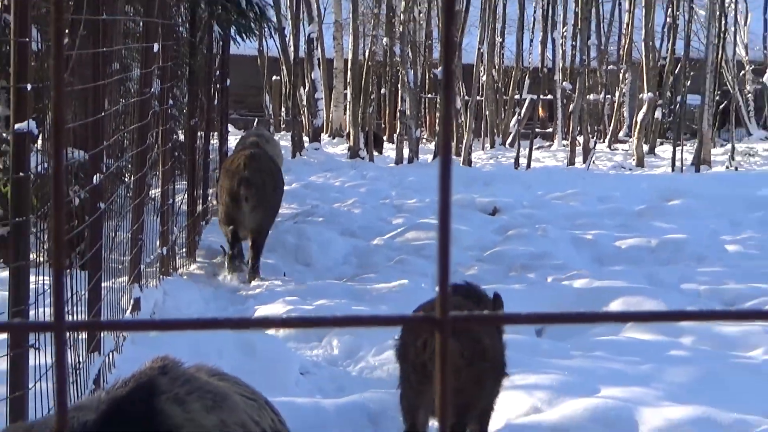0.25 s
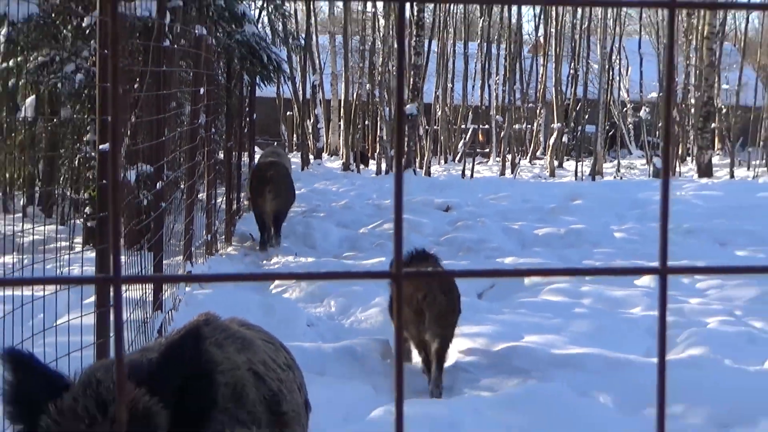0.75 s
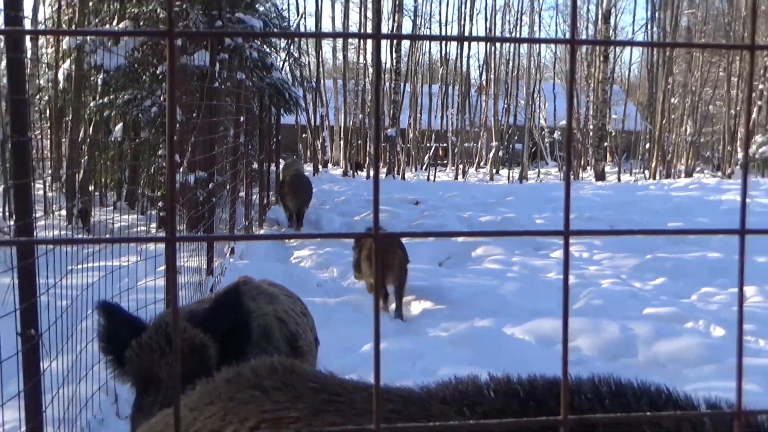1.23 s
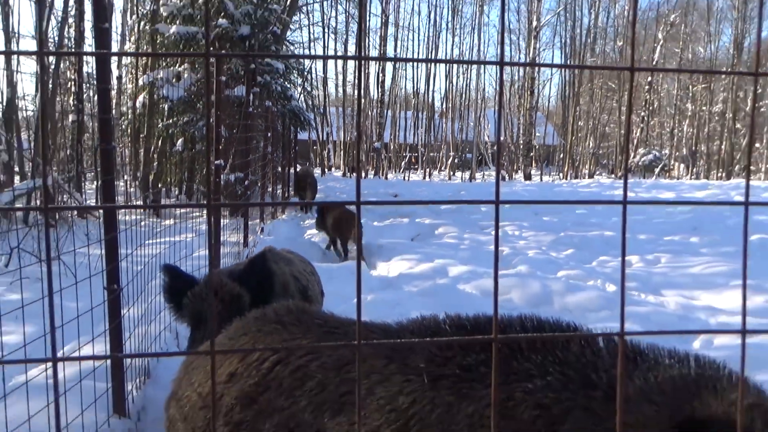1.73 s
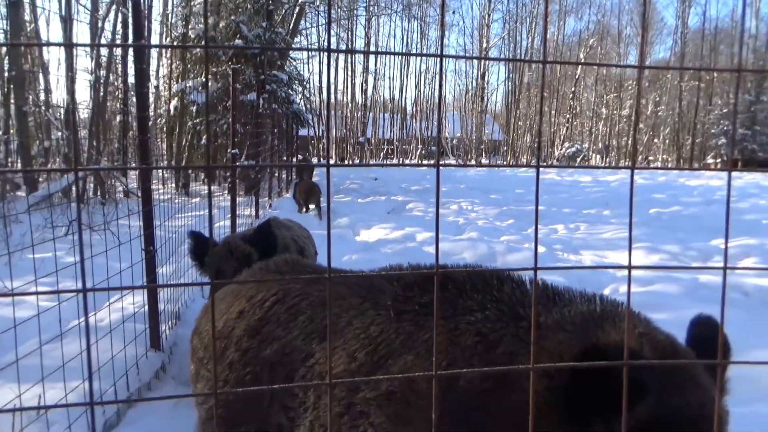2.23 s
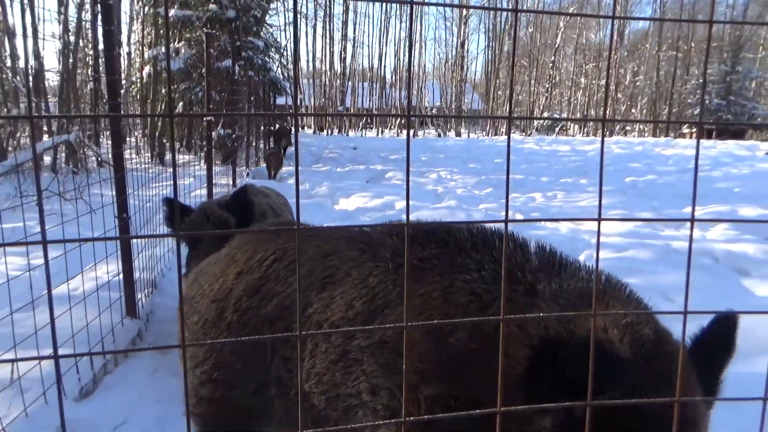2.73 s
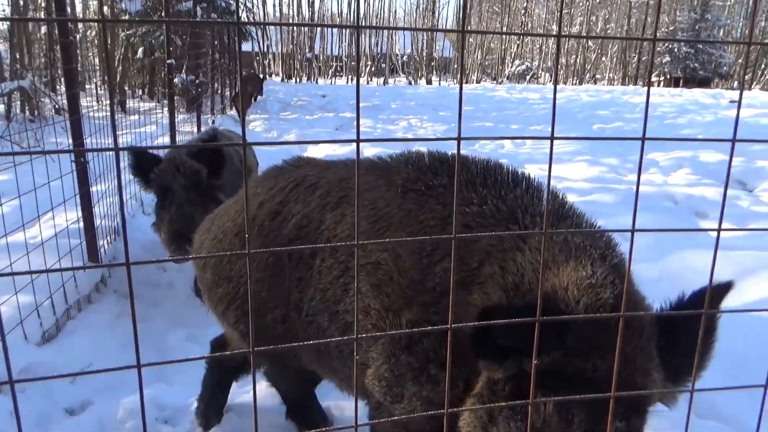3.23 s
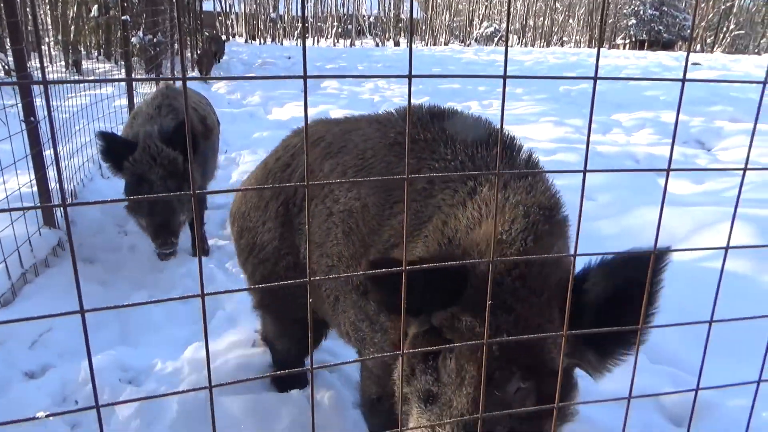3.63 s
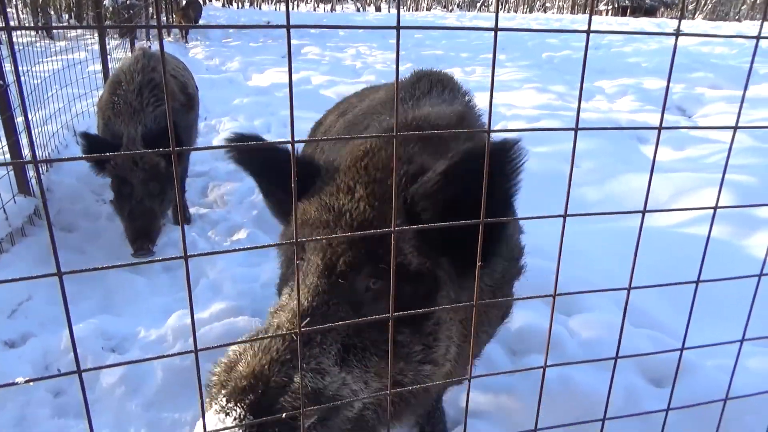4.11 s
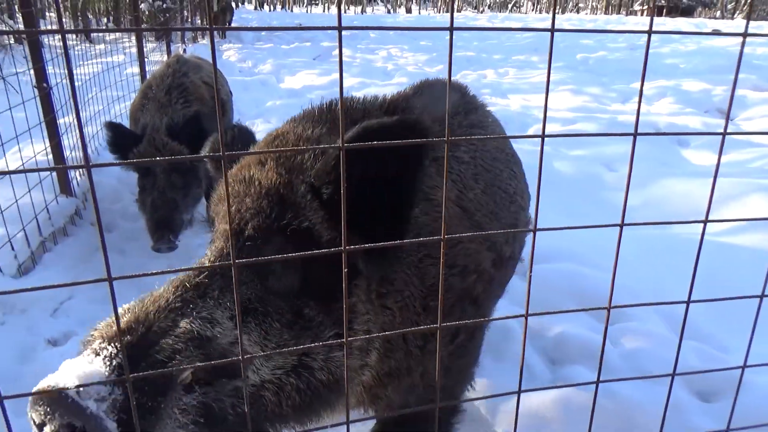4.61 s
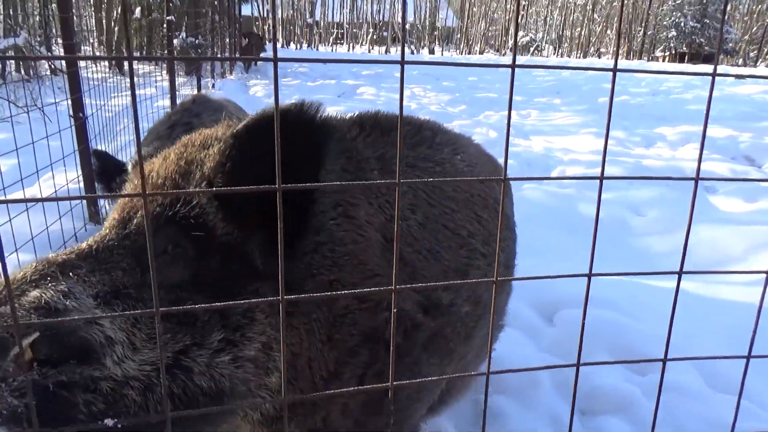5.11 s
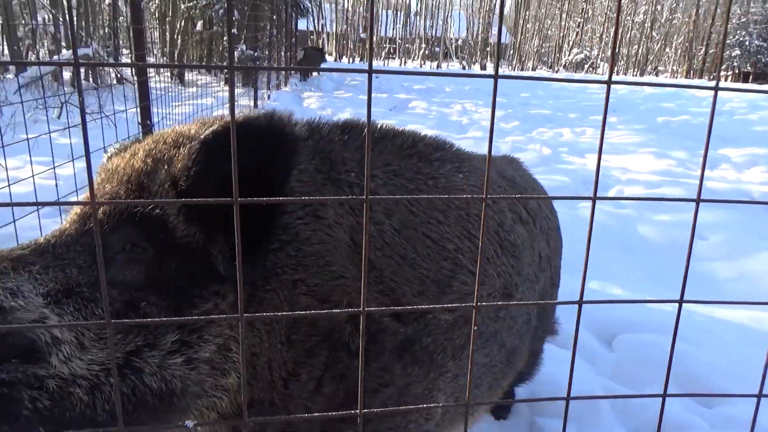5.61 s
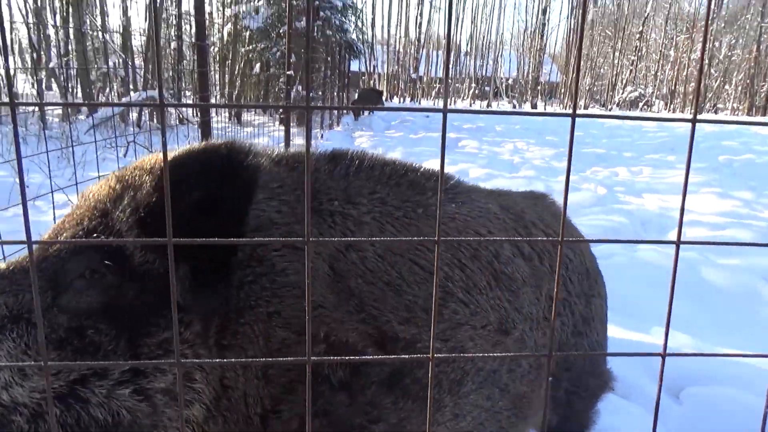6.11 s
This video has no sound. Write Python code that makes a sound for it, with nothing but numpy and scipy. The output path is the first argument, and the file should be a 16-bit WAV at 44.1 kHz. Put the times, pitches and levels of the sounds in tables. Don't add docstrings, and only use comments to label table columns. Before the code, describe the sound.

Still, open winter air with a soft hiss and a faint, slightly unsteady machine hum far away. From 0 to 2.2 seconds small, fizzy hoof crunches and tiny crust ticks move off through snow. A low, brief boar grunt comes at about 0.8, a longer, rougher one at 1.05 to 1.4, and a short one near 1.55, with fluttering, rattling snores on top. It is nearly quiet until 2.6, when fine dry crackling starts close by. From 3.2 the snow crunches in grainy shoves, with dull thuds and small squelches; a gentle sniff comes around 4. Crisp cracks thicken after 4.1. At 4.85 to 5.15 a forceful sniff meets the loudest, sharp, brittle crust breaks. Another sniff follows at 5.25, then crunching continues with whistly, breathy nostril puffs around 5.6 to 6.1, easing into lighter crumbling and thuds by 6.35. The close sounds are dry, wide and slightly left-leaning.

```python
import sys
import numpy as np
from scipy import signal
from scipy.fft import rfft, irfft, next_fast_len
from scipy.io import wavfile
from scipy.ndimage import uniform_filter1d, map_coordinates

SR = 44100
rng = np.random.default_rng(int(sys.argv[2]) if len(sys.argv) > 2 else 0)


def master_out(mix):
    frames = np.transpose(np.atleast_2d(mix))
    ceiling = np.clip(frames, -1, 1)
    pcm = np.round(ceiling * 32767).astype(np.int16)
    wavfile.write(sys.argv[1], SR, pcm)


def ratio_of_db(decibels):
    return 10 ** (np.asarray(decibels, float) / 20)


N = 280374


def unit(x):
    return x / np.sqrt(np.mean(x ** 2) + 1e-20)


def along(points, hz):
    f, v = np.transpose(points)
    return np.interp(np.log(hz + 1), np.log(f + 1), v)


def curves(rows, fade=0.013):
    s, *cols = np.transpose(rows)
    t = np.arange(N) / SR
    gate = np.interp(t, [s[0] - fade, s[0], s[-1], s[-1] + fade], [0, 1, 1, 0])
    return [np.interp(t, s, c) for c in cols] + [gate]


def wobble(rate):
    knots = rng.standard_normal(int(N * rate / SR) + 4)
    return map_coordinates(knots, [np.arange(N) * rate / SR])


def filtered(x, response):
    m = next_fast_len(N + SR // 4)
    return irfft(rfft(x, m) * response(np.fft.rfftfreq(m, 1 / SR)), m)[..., :N]


def colour(spectrum):
    return lambda hz: unit(ratio_of_db(along(spectrum, hz)))


def cavity(modes):
    def response(f):
        h = sum(ratio_of_db(db) * 1j * f * w / (c * c - f * f + 1j * f * w) for c, w, db in modes)
        return h / np.sqrt(np.mean(abs(h) ** 2))
    return response


def grit(shape, spike_db):
    return unit(rng.standard_normal(shape) * ratio_of_db(spike_db * rng.exponential(size=shape)))


def place(seconds, pieces):
    first = np.round(np.asarray(seconds) * SR).astype(int)
    at = first[:, None] + np.arange(pieces.shape[1])
    return np.bincount(at.ravel(), pieces.ravel(), N + SR)[:N]


def bursts(length_ms, spike_db, fall_db, rise=.35):
    u = np.arange(SR // 25) * 1000 / SR / np.clip(length_ms, .3, 18)[:, None]
    clump_db = 2.5 * np.repeat(rng.standard_normal((len(u), 41)), 44, axis=1)[:, :u.shape[1]]
    main_break = ratio_of_db(-fall_db * u) * np.clip(5 - 5 * u, 0, 1)
    crumble = ratio_of_db(-15) * np.clip(10 - 5 * u, 0, 1)
    run = grit(u.shape, spike_db) * ratio_of_db(clump_db) * (main_break + crumble) * np.clip(u / rise, .1, 1)
    return run / np.sqrt((run ** 2).sum(axis=1, keepdims=True) / (length_ms[:, None] * SR / 1000))


# frequency in Hz, level in dB.
AIR_TONE = [(20, -30), (58, -2), (110, -14.5), (180, -11), (260, -7), (400, -12), (780, -10.5), (1300, -14),
            (3500, -19.5), (4900, -21.5), (6000, -23), (9000, -21.5), (12000, -26), (16000, -33)]
# frequency in Hz, likeness from 0 to 1.
AIR_ALIKE = [(60, 1.0), (130, 0.93), (290, 0.85), (640, 0.28), (1410, 0.26), (3100, 0.56), (6820, 0.8),
             (15000, 1)]


def still_air():
    turn = lambda hz: np.arccos(np.clip(along(AIR_ALIKE, hz), -1, 1)) / 2
    shape = lambda hz: ratio_of_db(along(AIR_TONE, hz)) * [np.cos(turn(hz)), np.sin(turn(hz))]
    mid, side = filtered(rng.standard_normal((2, N)), shape)
    return ratio_of_db(-61.5 + 0.4 * wobble(5.64)) * unit(np.array([mid + side, mid - side]))


# frequency in Hz, rms level in dB.
HUM = [
    (56.5, -64.5),
    (217, -77.5),
]
# frequency in Hz, width in Hz, level in dB.
MURMUR = [
    (255, 24, 1),
    (746, 93, -3),
]


def far_machine():
    murmur = ratio_of_db(-72.5 + 2.8 * wobble(9.8)) * filtered(rng.standard_normal(N), cavity(MURMUR))
    hum = 0
    for hz, db in HUM:
        phase = 2 * np.pi * hz * np.cumsum(1 + 0.0096 * wobble(2.3)) / SR
        hum = hum + np.sqrt(2) * ratio_of_db(db + wobble(4.16)) * np.sin(phase)
    return hum + murmur


# middle in seconds, half length in seconds, fizz level in dB, crunch level in dB.
HOOF_FALLS = [(.01, 0.02, -68, -82), (0.258, 0.047, -65, -74), (0.423, 0.049, -71, -80),
              (0.535, 0.018, -71, -85), (0.74, 0.039, -68.5, -71), (0.954, 0.012, -68, -74),
              (1.125, 0.18, -69, -65.5), (1.25, 0.016, -58, -66), (1.368, 0.085, -64, -63),
              (1.54, 0.063, -74, -67), (1.637, 0.059, -63.5, -64.5), (1.846, 0.059, -71, -80),
              (1.99, 0.017, -72, -60), (2.233, 0.019, -65, -59.5)]
# start in seconds, peak in dB.
TICKS = [
    (0.2128, -44),
    (0.392, -45),
    (0.5423, -44),
    (0.7167, -46),
    (0.9476, -39.5),
    (1.233, -42),
    (1.246, -33.5),
    (1.3283, -46),
    (2.0352, -43),
    (2.2122, -38),
]
# frequency in Hz, level in dB per Hz.
FIZZ = [(3000, -66), (5000, -12), (6500, -1), (8700, 3), (10500, -2), (12000, -9), (14000, -13.5),
        (16000, -29)]
# frequency in Hz, level in dB per Hz.
SHARD = [(450, 1), (1000, 5), (2000, 7), (3000, 6), (5000, -2.5), (7000, -18), (16000, -43)]


def trot():
    s, half, fizz_db, crunch_db = np.transpose(HOOF_FALLS)[:, :, None]
    swell = np.exp(-((np.arange(0, N, 64) / SR - s) / half) ** 2)
    fizz, crunch = (np.repeat((ratio_of_db(db) * swell).sum(axis=0), 64)[:N] for db in (fizz_db, crunch_db))
    grains = ratio_of_db(2 * wobble(60)) * grit(N, spike_db=1.5)
    puffs = fizz * unit(filtered(grains, colour(FIZZ))) + crunch * unit(filtered(grains, colour(SHARD)))
    s, db = np.transpose(TICKS)
    run = bursts(np.full(len(s), 1.5), spike_db=1.5, fall_db=14)
    ticks = filtered(place(s, run * ratio_of_db(db - 11.5)[:, None]), colour(FIZZ))
    return puffs + ticks


def grunt(rows, orders):
    hz, effort_db, open_db, on = curves(rows)
    phase = 2 * np.pi * np.cumsum(hz * (1 + 0.017 * wobble(24.56))) / SR
    levels_db = effort_db, effort_db + open_db, effort_db - 10.5
    tones = (np.sqrt(2) * ratio_of_db(db + 2.1 * wobble(29.3)) * np.sin(k * phase) for k, db in zip(orders, levels_db))
    return on * sum(tones)


# time in seconds, pitch in Hz, effort in dB, throat openness in dB.
GRUNT_LOW = [
    (.75, 60.2, -63, -16),
    (.83, 57.2, -55, -10),
    (.9, 53.5, -59, -1.5),
    (.95, 52, -61, -4),
    (.99, 49, -80, 13),
    (1.05, 47.2, -81, 18),
]
GRUNT_LONG = [
    (1.075, 38.9, -55, -5),
    (1.09, 39.9, -62, -1),
    (1.15, 43.2, -56.5, -3),
    (1.26, 41.1, -59.5, -8),
    (1.3, 42.7, -59, 0),
    (1.34, 35.9, -56, 1),
    (1.38, 46, -56, -9),
    (1.41, 49, -65, 0),
]
GRUNT_SHORT = [
    (1.48, 39.5, -78, 9),
    (1.52, 39, -73, 2),
    (1.6, 39, -65, -7),
    (1.64, 39, -78, 2),
]


def grunting():
    return grunt(GRUNT_LOW, (1, 2)) + grunt(GRUNT_LONG, (2, 3, 5)) + grunt(GRUNT_SHORT, (2, 3, 5))


# first, last and loudest slap in seconds, peak in dB, nasal ring in dB.
SNORES = [
    (.815, .864, .84, -50, -70),
    (1.04, 1.142, 1.04, -35, -57),
    (1.186, 1.287, 1.287, -41, -57),
    (1.3094, 1.38, 1.33, -44, -59),
    (1.5022, 1.5022, 1.5022, -47, -66),
    (1.5246, 1.603, 1.59, -33, -54),
    (1.6257, 1.6257, 1.6257, -46, -63),
    (2.2374, 2.2374, 2.2374, -46, -63),
]
# frequency in Hz, width in Hz, level in dB.
SNOUT = [
    (1600, 650, 0),
    (2400, 800, 0),
    (3050, 500, 0),
    (4450, 600, 0),
]


def snore():
    slap_s, quickens_s = .0248, .002
    swell, fade = 108, 199
    slaps = []
    for first, last, top, db, nasal_db in SNORES:
        u = np.linspace(0, 1, round(abs(last - first) / slap_s) + 1)
        beats = first + (last - first) * u + quickens_s * (last - first) / slap_s * u * (1 - u)
        slaps += [(s, db - swell * max(top - s, 0) - fade * max(s - top, 0), nasal_db) for s in beats]
    s, db, nasal_db = np.transpose(slaps)
    t = np.arange(400) / SR
    slap = (t == 0) + .13 * rng.standard_normal((len(s), len(t))) * ratio_of_db(-60 * t / .013)
    share_db = rng.standard_normal((len(s), 4)).T * [[1.5], [1.5], [3], [3]]
    levels_db = db - 3, db - 3, nasal_db - 2, nasal_db + 2
    out = 0
    for mode, level_db, own_db, sign in zip(SNOUT, levels_db, share_db, (1, -1, 1, -1)):
        ring = lambda hz: cavity([mode])(hz) ** 2 * hz ** 2 / (hz ** 2 + 900 ** 2)
        out = out + filtered(place(s + .001, sign * slap * ratio_of_db(level_db + own_db)[:, None]), ring)
    return out


def pushes(rows, fall_db, lag):
    s, db, hz = np.transpose(rows)[:, :, None]
    turn = hz * np.arange(SR // 12) / SR
    swing = ratio_of_db(db - fall_db * turn) * np.sin(2 * np.pi * turn) * (1 - np.exp(-turn / 0.18))
    return place(s[:, 0] + lag, swing)


# start in seconds, peak in dB, frequency in Hz.
THUDS = [(2.935, -37, 556), (3.065, -44, 410), (3.185, -33.5, 490), (3.228, -49, 182), (3.286, -39, 470),
         (3.418, -41, 373), (3.501, -43, 388), (3.795, -49, 163), (4.089, -42, 537), (4.191, -34, 460),
         (4.237, -40.5, 505), (4.306, -41.5, 136), (4.37, -37.5, 550), (4.433, -33, 220),
         (4.665, -43.5, 210), (4.713, -42, 149), (4.771, -40, 231), (4.867, -40, 177), (4.904, -36, 225),
         (4.986, -33, 285), (5.119, -30, 257), (5.202, -29.5, 221), (5.285, -35, 450), (5.447, -33.5, 340),
         (5.655, -37, 263), (5.867, -35, 537), (5.989, -39, 210), (6.088, -34.5, 169), (6.165, -39.5, 150),
         (6.228, -38.5, 147), (3.711, -49, 156), (3.896, -48.5, 159), (5.342, -42, 174), (5.78, -44, 200),
         (5.845, -51, 151), (5.866, -39, 201.8), (5.99, -41, 406), (6.04, -44, 151), (6.231, -39, 475.4)]
# start in seconds, peak in dB, frequency in Hz.
SQUELCHES = [
    (2.884, -37, 886),
    (2.940, -32, 1050),
    (3.0105, -35, 1390),
    (5.1245, -22, 1090),
    (5.452, -30, 1440),
    (6.2, -37, 1250),
    (6.352, -37, 690),
    (3.898, -31, 1330),
    (5.758, -36, 910),
]


def thuds():
    pockets = pushes(SQUELCHES, fall_db=2.2, lag=.001)
    return ratio_of_db(8.5) * pushes(THUDS, fall_db=8.5, lag=0.00413) + pockets


# time in seconds, peak in dB, frequency in Hz.
SNAPS = [(1.155, -30, 4940), (3.6495, -37, 7000), (3.811, -16.5, 9150), (4.198, -22, 6000),
         (4.4973, -17.5, 9000), (4.843, -21, 6000), (4.9045, -5.5, 5960), (4.9241, -9.5, 6530),
         (4.9916, -10.5, 3400), (4.995, -10, 6000), (4.9948, -17, 6040), (5.1237, -16.5, 4000),
         (5.1269, -12, 2580), (5.2426, -15, 6000), (5.2915, -22, 1800), (5.4526, -14, 2000),
         (5.5655, -26, 1500), (5.513, -19, 7990), (5.524, -19, 7000), (5.5358, -21, 7000)]


def snaps():
    s, db, hz = np.transpose(SNAPS)[:, :, None]
    turn = hz * (np.arange(64) - 24) / SR
    return place(s[:, 0] - 24 / SR, -ratio_of_db(db) * np.cos(2 * np.pi * turn) * np.exp(-(turn / .45) ** 2))


# start in seconds, peak in dB, chunk share in dB, fizz share in dB.
BREAKS = [(2.7073, -19.5, -24, -14), (2.9402, -25, -18, -9), (3.073, -30.5, -6.5, -3.5),
          (3.237, -18.5, -45, -4.5), (3.2864, -30.5, -5, -24), (3.4298, -21, -16.5, -15),
          (3.5117, -22.5, -22, -18), (3.898, -29.5, -8, -4), (4.142, -23.5, -39, -7),
          (4.1975, -20, -16, -1), (4.2443, -22.5, -17, -6), (4.3064, -20.5, -18, -10.5),
          (4.4281, -18, -15, -11), (4.6045, -29, -12, -11), (4.7159, -25.5, -6, -8),
          (4.778, -26.5, -17, -12), (4.8374, -24.5, -21, -1), (4.8696, -13.5, -27, -14),
          (4.9911, -4.5, -27, -8.5), (5.1234, -4, -21.5, -11), (5.206, -16.5, -12.5, -9),
          (5.2907, -19, -8.5, -11.5), (5.3556, -29.5, -2.5, -28), (5.451, -19, -6, -11),
          (5.5648, -22, -5, -8), (5.663, -11.5, -28, -12), (5.6982, -17, -19, -20),
          (5.8725, -18, -12, -11.5), (6.0927, -21.5, -6.5, -4), (6.236, -48, 8, -20)]
# start in seconds, peak in dB.
CRACKLES = [(2.599, -37), (2.6145, -41.5), (2.641, -39), (2.6758, -31.5), (2.7362, -34), (2.754, -33),
            (2.7835, -32), (2.8187, -30.5), (2.837, -31), (2.8573, -32), (2.881, -31), (2.924, -33),
            (2.97, -27), (3.0093, -27.5), (3.0518, -33), (4.6457, -32), (3.151, -27.5), (3.1906, -30),
            (3.492, -26), (3.8094, -32), (3.9493, -28.5), (4.099, -26.5), (4.1544, -28), (4.3318, -27.5),
            (4.374, -24), (4.4828, -29), (4.6734, -30.5), (5.611, -36), (5.754, -29), (6.1852, -33),
            (4.4406, -21), (2.7027, -38)]
# start in seconds, peak in dB, fizz share in dB.
CRUMBS = [(2.7129, -38, -11), (2.7304, -33, -12), (2.7599, -28.5, -15), (2.7674, -41, -18),
          (2.7914, -33, -10), (2.8024, -34, -7), (2.8254, -32, -14), (2.8444, -31.5, -17),
          (2.8634, -36, -12), (2.8914, -33, -7), (2.8994, -39, -7), (2.9138, -33, -7), (2.9614, -32, -10),
          (2.9834, -50, -18), (2.9954, -39, -3), (3.0274, -42, -10), (3.0979, -48, -7), (3.1104, -51, -7),
          (3.1294, -41, -10.5), (3.2254, -23, -16), (3.3564, -22.5, -8.5), (3.5704, -28, -13),
          (3.6714, -23, -16), (3.9044, -29, -6), (4.4014, -28.5, -9), (4.4338, -19.5, -11),
          (4.4454, -27, -11), (4.9974, -16, -12), (5.1314, -17, -11.5), (5.2484, -25.5, -6.5),
          (5.8824, -21, -14), (6.0464, -32, -14), (6.1164, -27, -6), (6.3044, -33, -14)]
# frequency in Hz, level in dB per Hz.
CHUNK = [(150, -46), (400, 11.5), (1200, 3.5), (2000, 4), (3500, -60)]


def cracks():
    small_chunk_db, crackle_fizz_db = -21, -7.5
    crackles = [(s, db, small_chunk_db, crackle_fizz_db) for s, db in CRACKLES]
    crumbs = [(s, db, small_chunk_db, fizz_db) for s, db, fizz_db in CRUMBS]
    s, db, chunk_db, fizz_db = np.transpose([*BREAKS, *crackles, *crumbs])
    hard = db > -16
    chance = rng.standard_normal((len(s), 2))
    length_ms = np.where(hard, 4.2, 5.76 + 0.57 * chance[:, 0])
    run = bursts(length_ms, spike_db=1.5, fall_db=8, rise=np.where(hard, .04, .45)[:, None])
    shard_db = np.where(hard, 0, 3 * chance[:, 1])
    layers = (db + chunk_db - 6.5, CHUNK), (db + shard_db - 19.5, SHARD), (db + fizz_db - 7.5, FIZZ)
    start = s - 0.000991 * ~hard
    return sum(filtered(place(start, run * ratio_of_db(level_db)[:, None]), colour(tone)) for level_db, tone in layers)


def strokes(rows):
    s, hold, db, rise, fall = np.transpose(rows)[:, :, None]
    knots = np.arange(0, N + 64, 64)
    u = knots / SR - s
    sag = 2.5 * np.clip(u, 0, abs(hold))
    level = db - rise * np.maximum(-u, 0) - sag - fall * np.maximum(u - abs(hold), 0)
    return np.interp(np.arange(N), knots, level.max(axis=0))


def share(strength_db, over_db, grows):
    pivot_db = -45
    return ratio_of_db(pivot_db + over_db + grows * (strength_db - pivot_db))


# frequency in Hz, level in dB per Hz. First, crunching grains.
CRUNCH = [(1200, -21), (1800, -7.5), (2500, -0.5), (3200, -10), (4200, -56)]
LUMPS = [(250, -17), (500, -1), (1200, 0.5), (1900, -3), (2600, -29)]
FLAKES = [(2500, -27), (3300, -2), (5500, -4.5), (7000, -30)]
SHOVE = [(25, -2), (60, -2.5), (200, 1), (500, -7), (900, -62)]


def shoved_snow(push_db, sniff_db, out, lumps, wide):
    broken_db = np.interp(push_db, [-58, -44], [4, 1.6])
    clump = broken_db * wobble(80)

    def grains(tone):
        return unit(filtered(ratio_of_db(clump + wobble(220)) * grit(N, spike_db=1.6), colour(tone)))

    scatter = share(sniff_db, -8.5 - 2 * out, 0.88)
    crunch = np.hypot(share(push_db, -7.5, 0.84), scatter)
    bed = ratio_of_db(push_db) * grains(FIZZ) + lumps * grains(LUMPS) + crunch * grains(CRUNCH)
    bed = bed + share(push_db, -8, 0.79) * grains(FLAKES)
    rumble = filtered(rng.standard_normal(N), colour(SHOVE))
    shove = unit(ratio_of_db(1.03 * clump + 1.6 * wobble(22)) * rumble)
    return bed + ratio_of_db(-25.5) * np.hypot(lumps, wide) ** 0.56 * shove


def glide(x, ratio):
    position = np.cumsum(ratio + .012 * wobble(11))
    return map_coordinates(x, [uniform_filter1d(position, 64) % N], mode="wrap")


def whistle(air, modes, flare):
    tones = 0
    for hz, width, db in modes:
        patches = ratio_of_db(db + 2.2 * wobble(22))
        tones = tones + patches * np.sqrt(width) * filtered(air, cavity([(hz, width, 0)]))
    return glide(unit(tones), flare)


# frequency in Hz, width in Hz, level in dB.
WIDE = [
    (566, 560, 10.5),
    (1050, 260, 11),
    (1270, 170, -4),
    (1620, 840, -19),
]
# frequency in Hz, width in Hz, level in dB.
NARROW = [
    [(2600, 450, -7), (3550, 350, -5), (4340, 190, 5), (4660, 200, 1), (4980, 220, 0)],
    [(3590, 200, 5), (4170, 220, 5), (4720, 200, 2)],
]
# time in seconds, pitch ratio.
FLARE = [(4.75, 1.007), (4.98, 1.04), (5.04, 0.83), (5.12, .8), (5.2, 1.07), (5.58, 1.036), (5.78, 0.99),
         (5.9, 1.01), (6.0, .98), (6.1, 1.015), (6.3, 0.95)]


def nostrils(sniff_db, out, wide):
    air = ratio_of_db(2.06 * wobble(50) + 1.35 * wobble(200)) * rng.standard_normal(N)
    flare = curves(FLARE)[0]
    narrow = (1 - out) * whistle(air, NARROW[0], flare) + out * whistle(air, NARROW[1], flare)
    return wide * glide(unit(filtered(air, cavity(WIDE))), flare) + ratio_of_db(sniff_db) * narrow


# time of full strength in seconds, hold in seconds, strength in dB, rise before
# and fall after in dB per second.
SHOVES = [(2.826, 0.36, -55, 124, 144), (3.236, 0.2, -37.5, 702, 154), (3.505, 0.082, -39, 175, 87),
          (3.64, 0.18, -44.5, 102, 104), (3.91, 0.0092, -42.5, 208, 70), (4.18, 0.21, -49.5, 500, 300),
          (4.428, 0.014, -38, 700, 700), (4.495, 0.017, -46, 187, 905), (4.72, 0.015, -48, 125, 63),
          (4.86, 0.07, -38.5, 112, 145), (5.071, .01, -44, 200, 47), (5.252, 0.013, -44.5, 74, 89),
          (5.55, .01, -44.5, 40, 37), (5.578, 0.0045, -37.5, 250, 162), (5.7, 0.21, -47, 50, 221),
          (6.105, 0.0092, -41, 258, 119), (6.216, 0.071, -53, 100, 34)]
# time of full force in seconds, hold in seconds,
# force in dB, rise before and fall after in dB per second.
SNIFFS = [(3.95, 0.18, -58, 96, 300), (4.72, .03, -65, 140, 60), (4.87, 0.082, -35.5, 161, 350),
          (5.06, 0.015, -45.5, 300, 94), (5.24, 0.024, -40, 253, 246), (5.578, .005, -51, 135, 189),
          (5.7, 0.13, -52, 124, 100), (5.83, .02, -48, 100, 100), (5.883, .005, -39, 370, 232),
          (5.916, .01, -43.5, 100, 33), (6.105, 0.0056, -36.5, 182, 170), (6.216, 0.086, -56.5, 100, 25)]


def rooting():
    push_db, sniff_db = strokes(SHOVES), strokes(SNIFFS)
    turning_out = np.interp(np.arange(N) / SR, [5.3, 5.7], [0, 1])
    out = np.clip(turning_out + .1 * wobble(14), 0, 1)
    lumps = share(push_db, -6.5, 0.67)
    wide = share(sniff_db, 0.5 - 3.5 * (1 - out), 0.54)
    return shoved_snow(push_db, sniff_db, out, lumps, wide) + nostrils(sniff_db, out, wide)


# frequency in Hz, side against middle in dB.
PORTS = [(60, -34), (110, -42), (200, -18.5), (380, -15.5), (700, -9.5), (1290, -10.5), (2380, -8),
         (4400, -7), (8120, -14.5), (15000, -30)]
# time in seconds, width in dB.
OFF_AXIS = [(2.5, -2), (3.2, -3.5), (4.6, -4), (4.86, 6), (5.1, 2.5), (5.45, 0), (5.9, 4.5), (6.12, 4),
            (6.36, 4)]


def ports(x):
    x_wide = x * ratio_of_db(curves(OFF_AXIS)[0])
    lag = filtered(x_wide, lambda hz: 1j * ratio_of_db(along(PORTS, hz) - 21.0))
    scatter = filtered(x_wide * unit(wobble(900)), lambda hz: ratio_of_db(along(PORTS, hz) - 3.5))
    return np.array([x - lag + scatter, x + lag - scatter])


# time in seconds, share of the treble that leans left.
LEAN = [(4.4, .02), (4.8, 0.059), (5.6, 0.13), (6.1, .02)]


def scene():
    background = still_air() + far_machine()
    far = trot() + grunting() + snore()
    near = thuds() + snaps() + cracks() + rooting()
    lean = curves(LEAN)[0] + .03 * wobble(9)
    treble = filtered(lean * near, lambda hz: hz / (hz + 600))
    return ports(near + far) + np.array([treble, -treble]) + background


def roll_off(x):
    return signal.sosfilt(signal.butter(12, 16230, fs=SR, output="sos"), x)


def record(dry):
    mix = filtered(dry, lambda hz: (hz < 16200) / (1 + (30 / (hz + 1)) ** 4))
    return roll_off(mix)


dry = scene()
out = record(dry)
master_out(out)
```